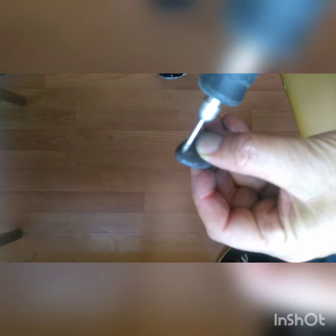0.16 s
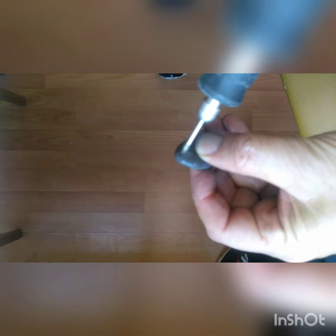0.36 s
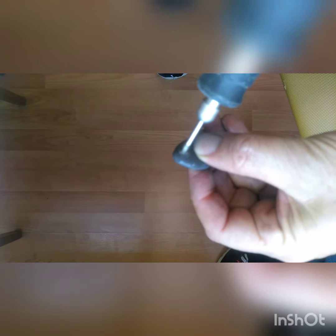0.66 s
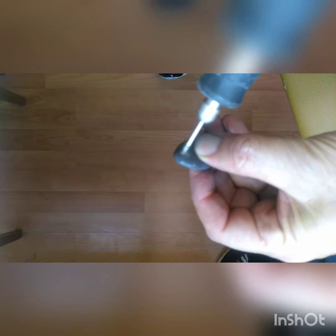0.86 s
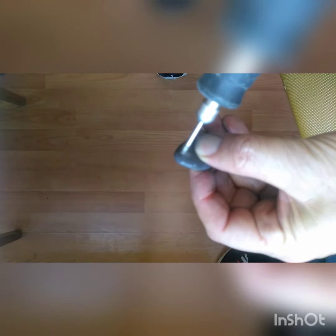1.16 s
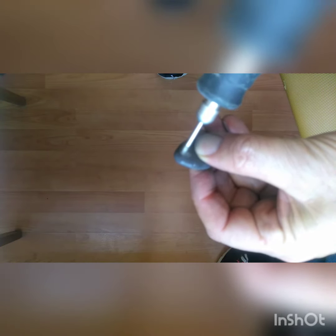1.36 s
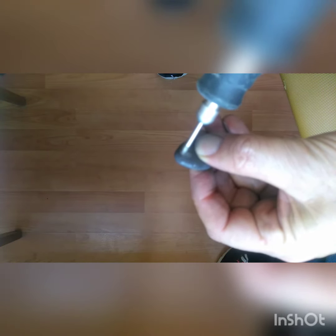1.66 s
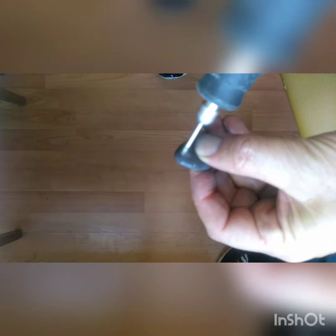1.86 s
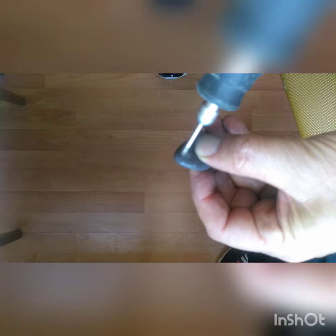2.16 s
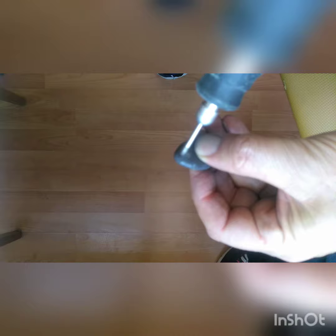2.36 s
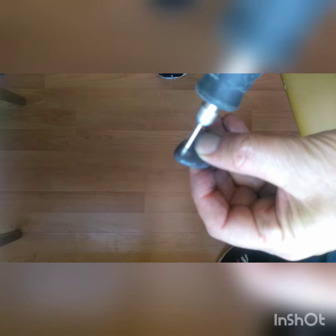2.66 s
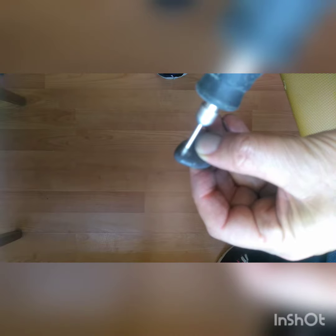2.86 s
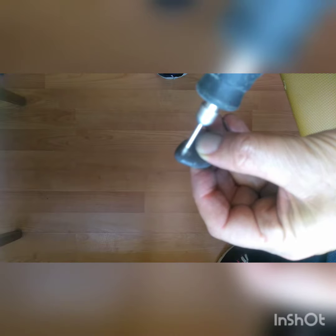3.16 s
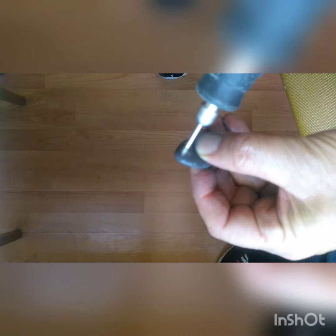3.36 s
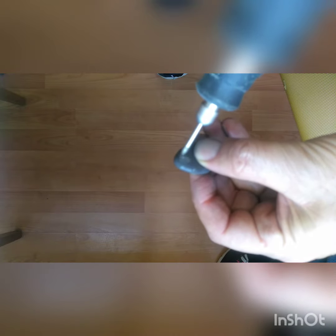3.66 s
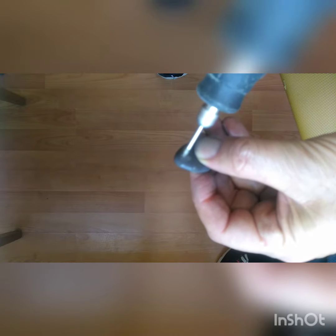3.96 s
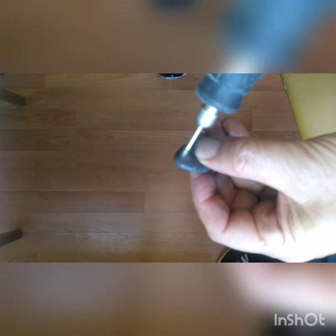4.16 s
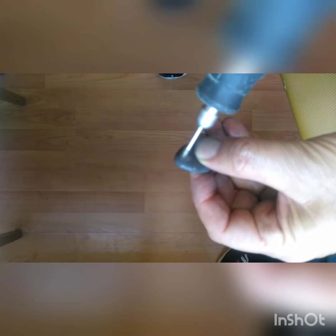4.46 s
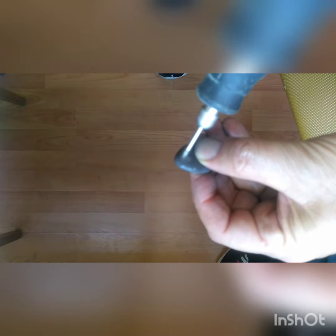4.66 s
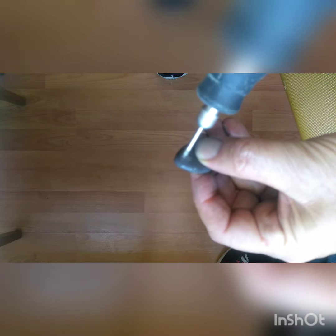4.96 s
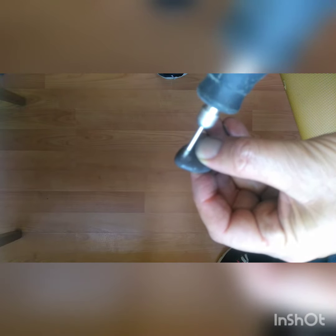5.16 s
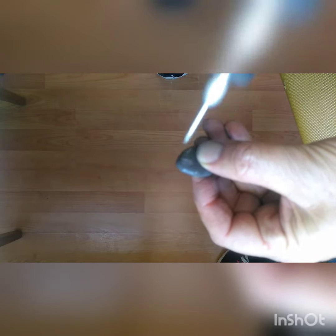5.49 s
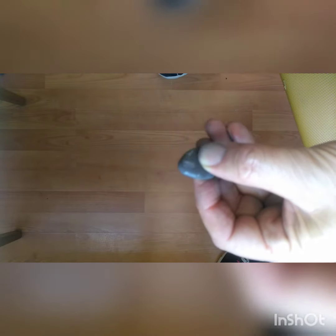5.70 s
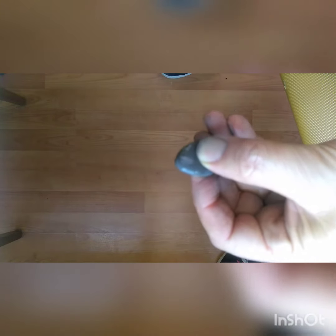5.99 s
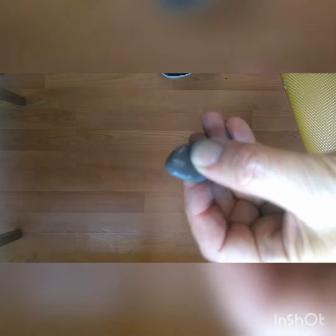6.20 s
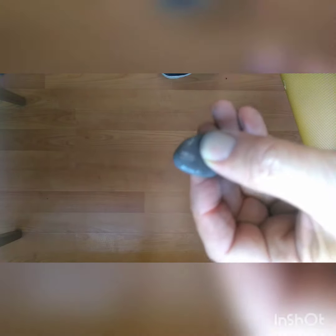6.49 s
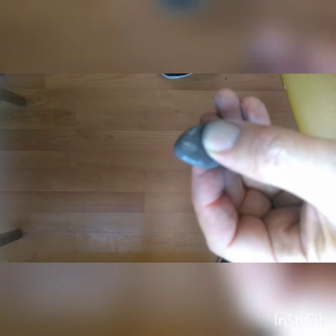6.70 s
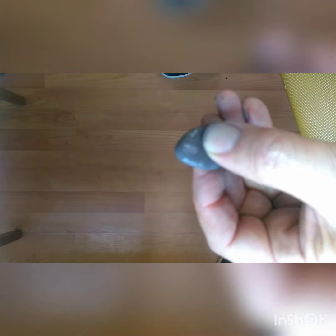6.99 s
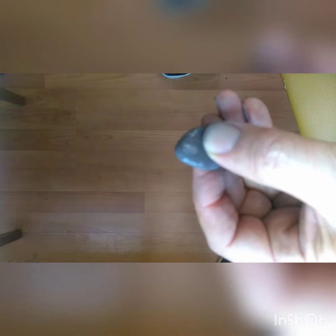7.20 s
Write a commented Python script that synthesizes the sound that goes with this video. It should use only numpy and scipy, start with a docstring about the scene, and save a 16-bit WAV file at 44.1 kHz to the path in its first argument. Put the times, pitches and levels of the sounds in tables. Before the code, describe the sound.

In a room, a handheld electric rotary tool runs at constant high speed, its fine bit buzzing and grinding on a small stone. The grind throbs rapidly, breaks briefly midway, then resumes. A rasping skid and short squeak end contact; the bare whine and airy rush swell close to a mono phone microphone with soft hand thuds, then cut off to near silence.

```python
"""In a room, a mains rotary tool runs at a steady high speed, its small bit pressed on a pebble held in the fingers.
Shaft, fan and bearings whine as sines at multiples of the shaft speed; air and broad grinding are coloured noise.
The bit's blows, one every second turn, ring resonances of stone and shank over filtered grinding noise.
Skids, a chirp, a squeak, thuds and rumble join in; lifted, the tool swings close to a mono phone microphone
until the sound is cut, leaving a faint rumble."""
import sys
import numpy as np
from scipy import signal
from scipy.fft import rfft, irfft, next_fast_len
from scipy.io import wavfile
from scipy.ndimage import uniform_filter1d

SR = 44100
rng = np.random.default_rng(int(sys.argv[2]) if len(sys.argv) > 2 else 0)


def wav_out(sig):
    """Save sig, one row per channel (or a flat mono array), as 16-bit PCM at SR to the path in sys.argv[1]."""
    wavfile.write(sys.argv[1], SR, np.round(np.clip(np.atleast_2d(sig).T, -1, 1) * 32767).astype(np.int16))


N = 323694
TIME = np.arange(N) / SR  # s


def undb(db):
    """Level law: decibels to amplitude gain."""
    return 10 ** (np.asarray(db) / 20)


def unit(x):
    """Power normalisation: scale to rms 1."""
    return x / np.sqrt(np.mean(x ** 2))


def columns(table):
    """Linear interpolation: every column after the time, one value a sample."""
    seconds, *values = np.transpose(table)
    return [np.interp(TIME, seconds, value) for value in values]


def between(table):
    """Gating: one while a curve table lasts, with soft edges."""
    inside = (TIME >= table[0][0]) & (TIME < table[-1][0])
    return uniform_filter1d(1. * inside, size=1500)


def swell(middle, length, db):
    """Amplitude envelope: a smooth rise to a peak in dB and fall, over a length in seconds."""
    away = np.clip(2 * np.abs(TIME - middle) / length, 0, 1)
    return undb(db) * (1 - away * away) ** 2


def walk(rate):
    """Slow random modulation: levels held 1 / rate s and smoothed twice; spread near 1."""
    hold = int(SR / rate)
    steps = np.repeat(rng.standard_normal(N // hold + 1), hold)
    slewed = uniform_filter1d(uniform_filter1d(steps, hold), hold)
    return 1.29 * slewed[:N]


def ring(x, modes):
    """Modal superposition: a sum of resonances, neighbours in opposite phase."""
    out = 0
    for k, (hz, width, db) in enumerate(modes):
        peak = signal.iirpeak(hz, hz / width, SR)
        out = out + (-1) ** k * undb(db) * signal.lfilter(*peak, x)
    return out


def coloured(spectrum):
    """Spectral shaping: white noise given a colour, rms 1."""
    hz, db = np.transpose(spectrum)
    size = next_fast_len(N)
    log_hz = np.log(np.fft.rfftfreq(size, 1 / SR) + 1)
    gain = undb(np.interp(log_hz, np.log(hz), db))
    return unit(irfft(rfft(rng.standard_normal(size)) * gain, size)[:N])


APPROACH_S, ARRIVE_S = 5.677, 6.51  # the tool swings from the stone to the phone


def approach():
    """Proximity: share of the near level, 0 at the stone, 1 by the phone."""
    return np.clip((TIME - APPROACH_S) / (ARRIVE_S - APPROACH_S), 0, 1)


# Shaft speed, drifting slightly down, then rising as the tool nears the phone.
# Each row: time in seconds, speed in Hz.
SPEED = [(0.0, 560.1), (0.7, 560.6), (1.2, 560.26), (1.7, 559.55), (2.8, 559.1), (3.6, 558.15),
         (4.45, 558.95), (5.3, 558.5), (5.7, 558.8), (5.95, 558.5), (6.08, 560.2), (6.5, 560.5),
         (6.9, 561.0)]


def shaft_turns():
    """Phase is the integral of speed: turns of the shaft so far, with a slight random drift."""
    shaft_hz = columns(SPEED)[0]
    return np.cumsum(shaft_hz * (1 + 0.000407 * walk(20))) / SR


# The stronger tones of shaft, bit, fan and bearings. Each entry: multiple of the shaft speed.
BEARING_ORDERS = [2, 4, 3.5, 6.613, 6.99, 7.361, 8, 8.997, 10.481, 10.857, 13.605, 17.994, 5, 5.614, 7.764,
                  10, 10.764, 11.856, 13.992, 14.348, 17.839]
# Starting phases of the first three of them. Each entry: phase in cycles.
IN_STEP = [0.25, 0.027, 0.63]


def tone(turns, order):
    """Shaft-locked harmonic: a sine of rms 1; the first three strong tones keep step with the bit's blows."""
    start = dict(zip(BEARING_ORDERS, IN_STEP)).get(order, rng.random())
    return np.sqrt(2) * np.sin(2 * np.pi * (order * turns + start))


# Tone at shaft speed. Each row: time in seconds, level in dB.
UNBALANCE = [(0.0, -46), (0.04, -44.5), (0.58, -45.5), (3.81, -41.5), (4.19, -43), (5.39, -42.5),
             (5.93, -39.5), (6.23, -45), (6.33, -40), (6.45, -40.5), (6.65, -36), (7.17, -38.5)]
# Levels of the stronger tones, added as powers, before a random flicker. Each row: level far off in dB, level
# added near the phone in dB, swells (middle and length in seconds, peak in dB) as the hand turns the tool or,
# for the fourth and third-and-a-half multiples, also as the shank and the bit sing in short bursts.
BEARING = [(-61.5, -32, [(1.9, 0.74, -65), (3.9, 0.47, -49.5), (5.5, 2.3, -47), (7.1, 1.2, -35)]),
           (-55.5, -39, [(.79, 0.19, -45), (1.02, 0.37, -43), (1.23, 0.15, -41.5), (1.47, 0.33, -44),
           (1.83, 0.25, -53), (2.05, .26, -45), (2.45, 0.61, -49), (3.8, 0.85, -48), (5.3, 1, -47),
           (6.3, 0.7, -38)]), (-63, -52, [(1.45, 0.36, -48), (1.98, 0.4, -47), (2.73, 0.43, -42),
           (3.04, .26, -44), (5.11, .24, -45)]), (-62.5, -39.5, [(.3, .7, -53), (3.9, 2.1, -54),
           (5.65, 0.77, -48)]), (-59, -42, [(.25, .6, -43), (.9, 1.8, -47.5), (2.55, 0.89, -54),
           (5.7, 0.55, -48), (6.48, 0.94, -33.5), (7.18, 0.49, -37)]), (-58, -37.5, [(.6, 0.96, -49),
           (1.45, 1.2, -47), (3.2, 0.51, -47), (4.3, 1.3, -55), (5.85, .3, -50), (6.3, 0.46, -38)]),
           (-50.5, -36.5, [(.2, 0.72, -46), (.65, .8, -45), (.98, 0.46, -45), (1.5, 0.88, -49),
           (2.1, 0.79, -57), (3.7, 1.7, -49), (5.2, 0.77, -52), (5.75, 0.35, -41.5), (5.98, 0.46, -54),
           (6.42, 0.79, -34.5), (7.1, 0.93, -32)]), (-55, -48, [(.7, 2.6, -50), (6.9, 0.55, -44.5)]),
           (-60, -57, [(1.27, 0.39, -48), (1.7, 2, -46.5), (2.7, .4, -49), (3.5, 1.23, -49.5),
           (5.1, 0.33, -47), (6.5, 0.73, -40), (7.18, 0.33, -46)]), (-66, -58.5, [(2.9, 0.89, -60),
           (5.9, 0.48, -50), (6.55, 1, -36.5)]), (-59, -64, [(.3, .6, -57), (3.6, .5, -61),
           (6.2, 1.5, -44.5), (6.9, .4, -50)]), (-66.5, -63, [(.1, 0.49, -63), (2.1, 1.8, -62),
           (4.7, 2.8, -58), (6.1, 0.49, -49.5)]), (-62, -43, [(.4, 1.1, -54), (1.3, 0.51, -52),
           (2.1, .9, -55), (4.5, 0.5, -48.5), (5.38, .3, -49), (6.5, 0.3, -39), (6.9, .4, -38)]),
           (-61, -51.5, [(.75, 0.59, -53), (2.05, 1.2, -50), (3.1, 0.47, -52), (5.3, .4, -53),
           (6.0, 0.38, -47), (7.05, 0.48, -49)]), (-70, -43, [(1.65, 0.47, -58), (2.5, 1.06, -58),
           (4.7, 1.4, -61)]), (-57.5, -51.5, [(2.4, 1.5, -50), (3.1, .3, -51), (4.4, 2.17, -55.5),
           (5.8, 0.43, -48), (6.95, 0.87, -41)]), (-56.5, -43.5, [(3.3, 1.5, -55), (6.55, 1.02, -47)]),
           (-53.5, -48, [(2.7, 1.8, -62), (4.8, 1.2, -51), (6.75, 0.48, -44.5)]),
           (-64.5, -59, [(6.3, .3, -51), (6.9, 0.94, -57.5)]), (-73, -62, [(1.5, 1.1, -62), (3.6, 1.5, -56),
           (5.0, .8, -60), (6.75, 0.47, -51)]), (-71.5, -60.5, [(1.4, .7, -61), (4.1, .8, -64),
           (5.8, 0.71, -58)])]
# Throb of the fan tone, deepest with the bit off the stone. Each row: time in seconds, depth from 0 to 1.
THROB = [(0.0, 0.1), (.8, 0), (3.2, 0.47), (3.7, 0.66), (4.1, 0.5), (5.6, 0.4), (6.2, .8), (6.6, 0.2),
         (7.2, 0.15)]
MAINS_HZ = 99.9  # twice the supply frequency
# Weaker tones of commutator and ball cage. Each entry: multiple of the shaft speed.
WEAK_ORDERS = [3, 3.12, 3.381, 6, 9.766, 10.107, 11, 11.23, 12.598, 14.723, 15.347, 16, 16.093, 16.72,
               17.092, 17.454, 18.831, 19.586, 20.213, 20.585, 20.956, 21.336, 21.707, 23, 23.711, 24.082,
               24.826, 26, 27.204, 27.581, 27.957]
# Their levels before shadowing and a random flicker. Each entry: level in dB over the broad noise.
WEAK_DB = [-20.5, -17, -16, -25, -36, -26.5, -26, -32, -23.5, -36, -42.5, -40, -33, -41.5, -38.5, -45,
           -46.5, -51, -43, -44.5, -46.5, -46, -60, -60.5, -57.5, -59.5, -58, -62, -62.5, -58, -58.5]


def whine(turns, noise):
    """Rotating-machine orders: unbalance and tones that come and go; the fan's throbs by amplitude modulation."""
    out = undb(columns(UNBALANCE)[0]) * tone(turns, order=1)
    depth = columns(THROB)[0]
    for order, (far_db, near_db, swells) in zip(BEARING_ORDERS, BEARING):
        near = undb(near_db) * approach()
        power = undb(far_db) ** 2 + near ** 2 + sum(swell(*s) ** 2 for s in swells)
        # only order 8, from the fan blades, throbs with the supply
        throb = 1 + depth * (order == 8) * np.cos(2 * np.pi * MAINS_HZ * TIME)
        out += throb * np.sqrt(power) * undb(0.73 * walk(9)) * tone(turns, order)
    for order, db in zip(WEAK_ORDERS, WEAK_DB):
        # the lower ones come out of the vents and are shadowed until these face the microphone
        facing = (noise / noise.max()) ** (.5 * (order < 5.5))
        out += noise * facing * undb(db + 2.2 * walk(2.3)) * tone(turns, order)
    return out


# levels of the direct noise: vent air alone, vent air with broad grinding noise, vent air added by the phone
VENT_DB, VENT_AND_GRINDING_DB, VENT_NEAR_DB = -44, -40, -24
CONTACT_EDGE_S = 0.2  # smoothing of the change as contact begins or ends


def direct_level():
    """Power addition: vent air, with broad grinding noise added while the bit is on the stone,
    and much louder near the phone."""
    contact = sum(between(table) for table in CONTACT)
    grinding = uniform_filter1d(contact, int(CONTACT_EDGE_S * SR))
    far = undb(VENT_DB + (VENT_AND_GRINDING_DB - VENT_DB) * grinding)
    return np.hypot(far, undb(VENT_NEAR_DB) * approach())


ROOM_DB = -38  # air heard through the room
# Colour of the air heard through the room. Each row: frequency in Hz, relative density in dB per Hz.
ROOM_AIR = [(20, -68.5), (60, -48), (90, -45), (130, -25.5), (300, -19.5), (650, -15.5), (1200, -1.5),
            (2190, -6), (3160, -20), (4440, -17.5), (5770, -13.5), (8000, -21), (10300, -32.5),
            (11400, -52), (12300, -57), (15600, -87.5)]
# Colour of the direct noise, vent air and broad grinding alike. Each row: frequency in Hz,
# relative density in dB per Hz.
DIRECT_NOISE = [(20, -59.5), (60, -44), (197, -21.5), (600, -23.5), (1030, -9), (1200, -2), (1350, -0.5),
                (1600, -5), (1950, -11), (2600, -8.5), (3500, -14.5), (4900, -14.5), (6500, -20),
                (7890, -27.5), (11700, -50), (15600, -64.5)]
# Bands of the direct noise that surge alone. Each row: centre in Hz, width in Hz, relative level in dB.
SURGE = [(1255, 500, 3.5), (2300, 780, -6), (4300, 2500, -11.5)]


def air_and_grinding(turns, level):
    """Broadband noise: fan air and broad grinding, puffing a little once a turn; the direct part flickers."""
    puff = 1 + 0.16 * np.cos(2 * np.pi * turns)
    room = undb(ROOM_DB) * coloured(ROOM_AIR)
    rush = coloured(DIRECT_NOISE)
    surges = sum(0.12 * walk(14) * ring(rush, [band]) for band in SURGE)
    direct = level * undb(.5 * walk(30)) * (rush + surges)
    return puff * (room + direct)


def gripped(blows, modes, flicker_db, rate):
    """Varying modal response: resonances swell and dip alone as the grip shifts, the first the least."""
    out = 0
    for k, mode in enumerate(modes):
        flicker = undb(flicker_db * min(k + .3, 1) * walk(rate))
        out = out + (-1) ** k * flicker * ring(blows, [mode])
    return unit(out)


# Bit on stone, one table a contact. Each row: time in seconds, knock in the stone in dB,
# knock in the shank in dB, bending note in dB before a random flicker, mean wobble rate in Hz.
CONTACT = [
    [(0.0, -49, -50, -46, 34.3), (0.18, -45, -41.5, -46.5, 34.1), (0.3, -37.5, -43, -47, 35.4),
     (0.8, -42.5, -40, -58, 34.86), (1.2, -41, -42, -60, 33.95), (1.45, -38.5, -41, -60, 31.5),
     (1.8, -39.5, -39.5, -63, 33.05), (2.1, -37, -40.5, -61, 34.08), (2.31, -39, -38, -53, 35.14),
     (2.4, -35, -39.5, -58, 36.4), (2.6, -34.5, -43, -36.5, 35.75), (2.95, -34, -43, -54, 30.6),
     (3.385, -34.5, -40.5, -42, 31.4), (3.45, -43, -54, -60, 30.75)],
    [(3.85, -50, -43, -55, 34), (4.02, -50, -46.5, -53, 34.7), (4.13, -38.5, -41.5, -42.5, 34.9),
     (4.3, -39.5, -42.5, -45, 35.5), (4.52, -36.5, -41, -41.5, 35.83), (4.575, -40, -41, -54, 33.9),
     (4.62, -35.5, -42, -48, 31.6), (4.8, -34.5, -42.5, -38, 33.4), (4.93, -35.5, -41, -48, 34),
     (5.05, -34.5, -39.5, -62, 34.66), (5.17, -35.5, -43, -55, 35.6), (5.24, -37, -42, -59, 35.6),
     (5.38, -46, -60, -62, 35.8)],
]
# Resonances of the stone. Each row: frequency in Hz, width in Hz, relative level in dB.
STONE = [(1129, 116, 4.5), (1400, 126, 0.5), (1607, 145, 1.5), (1956, 260, -1), (870, 180, -13.5)]
# Resonances of the shank. Each row: frequency in Hz, width in Hz, relative level in dB.
SHANK = [(2198, 47, 2.5), (2790, 140, -9), (3070, 90, -8), (3360, 58, -10.5)]
# Bands of the grinding hiss. Each row: centre in Hz, width in Hz, relative level in dB.
GRIT = [(6715, 490, -3.5), (5540, 3600, -11), (3430, 2760, -14)]
HISS_DB, HISS_SLOPE = -42, 1  # grinding hiss at a stone knock of -38 dB, and its dB per dB of knock
BENDING_LEAD = 0.37  # radians by which the bending note leads the wobble


def bit(turns):
    """Subharmonic impact: the bit bounces every second turn; it wobbles in the hole, so the blows throb."""
    out = np.zeros(N)
    for table in CONTACT:
        stone_db, shank_db, bending_db, wobble_hz = columns(table)
        hiss_db = HISS_DB + HISS_SLOPE * (stone_db + 38)
        wobble = 2 * np.pi * np.cumsum(wobble_hz * (1 + 0.016 * walk(12))) / SR
        # the wobble and the unsteady hand shift the blows early and late
        bounce = turns / 2 + 0.023 * np.sin(wobble + 1.7) + 0.019 * walk(33)
        at = np.flatnonzero(np.diff(np.floor(bounce)) > 0)
        strength = (1 + 0.28 * np.cos(wobble)) * undb(1.05 * walk(45) + 1.5 * walk(250))
        size = strength[at]
        # each blow is shared by two samples to fall between them
        early = bounce[at + 1] % 1 / np.diff(bounce)[at]
        blows = np.zeros(N)
        blows[at] = size * early
        blows[at + 1] = size * (1 - early)
        blows = signal.sosfilt(signal.butter(2, 4500, fs=SR, output="sos"), blows)  # a blow takes time
        knock = undb(stone_db) * gripped(blows, STONE, flicker_db=1.6, rate=17)
        knock += undb(shank_db) * gripped(blows, SHANK, flicker_db=2.2, rate=17)
        # the bit's own bending note lies one wobble rate above the second shaft multiple and beats with it
        bending = np.sqrt(2) * np.cos(4 * np.pi * turns + wobble + BENDING_LEAD)
        bending *= undb(bending_db + 1.0 * walk(8.1))
        # the grinding fades after each blow and throbs with the wobble
        scrape = 1.4 + np.exp(-(bounce % 1) / 0.51)
        scrape *= (1 + 0.16 * np.cos(wobble)) * rng.standard_normal(N)
        grind = signal.sosfilt(signal.butter(4, 8000, fs=SR, output="sos"), ring(scrape, GRIT))
        out += between(table) * (knock + bending + undb(hiss_db) * unit(grind))
    return out


# Rumble as hands and air move by the phone. Each row: time in seconds, level in dB before a random flicker.
HANDLING = [(0.55, -82), (0.85, -71), (1.1, -76), (1.25, -58), (1.5, -76), (4.95, -78), (5.02, -63),
            (5.18, -59), (5.3, -69), (5.8, -63), (6.1, -69), (6.22, -49.5), (6.5, -54), (6.7, -56.5),
            (6.9, -65), (7.18, -59.5)]


def handling():
    """Band-limited noise: an uneven low rumble."""
    band = signal.butter(2, [65, 300], "band", fs=SR, output="sos")
    low = signal.sosfilt(band, rng.standard_normal(N))
    return between(HANDLING) * undb(columns(HANDLING)[0] + 2.8 * walk(15)) * unit(low)


# Dull knocks of the hands. Each row: start in seconds, level in dB before the onset and decay,
# frequency in Hz, time to decay by 60 dB in seconds.
KNOCKS = [(1.218, -43, 247.5, 0.098), (4.55, -56, 70, .08), (5.014, -45, 110.3, 0.07),
          (5.07, -41, 180, 0.068), (5.125, -43, 95, 0.071), (5.185, -47, 160, 0.046),
          (5.362, -45, 110, .04), (5.462, -48, 85, 0.06), (5.774, -38, 160, 0.035), (6.2, -33, 270, .06),
          (6.32, -35, 202, .07), (6.439, -36.5, 205, 0.086)]


def knocks():
    """Damped oscillation: soft thuds, each a sine dying away exponentially."""
    out = np.zeros(N)
    for start, db, hz, t60 in KNOCKS:
        t = np.maximum(TIME - start, 0)
        onset = 1 - np.exp(-t / 0.0015)
        decay = np.exp(-np.log(1000) * t / t60)
        out += undb(db) * onset * decay * np.sin(2 * np.pi * hz * t)
    return out


# The bit skids over the stone. Each row: middle in seconds, length in seconds, peak in dB.
SLIPS = [(2.302, .12, -41), (5.082, .22, -53), (5.301, .26, -38.5)]
# Resonances of the rasp, passed twice. Each row: frequency in Hz, width in Hz, relative level in dB a pass.
RASP = [(2080, 1170, -3.5), (3120, 940, 0), (4430, 1200, -6)]


def slips():
    """Resonated friction noise: a grainy rasp at each skid."""
    grain = undb(2.4 * walk(150)) * rng.standard_normal(N)
    rasp = unit(ring(ring(grain, RASP), RASP))
    return sum(swell(*s) for s in SLIPS) * rasp


# The shank rings once as the bit catches. One row: middle in seconds, length in seconds, peak in dB,
# frequency in Hz.
CHIRP = (5.028, 0.3, -47, 3052)


def chirp():
    """Single-mode ringing: one brief sine of steady pitch."""
    middle, length, db, hz = CHIRP
    return swell(middle, length, db) * np.sqrt(2) * np.sin(2 * np.pi * hz * TIME)


# The bit slips free. Each row: time in seconds, frequency in Hz, level in dB.
SQUEAK = [(5.225, 2070, -50), (5.245, 2060, -34), (5.275, 2045, -35), (5.3, 2000, -41), (5.33, 2040, -43),
          (5.42, 2050, -52)]


def squeak():
    """Frequency modulation: a short whistle that falls, then turns up."""
    hz, db = columns(SQUEAK)
    whistle = np.sqrt(2) * np.sin(2 * np.pi * np.cumsum(hz) / SR)
    return between(SQUEAK) * undb(db) * whistle


# Treble of the rush as the tool swings past. One row: middle in seconds, length in seconds, peak in dB.
SHEEN = (6.13, 1, -39.5)
# Its bands, passed twice. Each row: centre in Hz, width in Hz, relative level in dB a pass.
SHEEN_BAND = [(6900, 1700, 3), (10900, 1900, -14)]


def sheen():
    """Resonance-filtered noise: a passing bright hiss."""
    hiss = ring(ring(rng.standard_normal(N), SHEEN_BAND), SHEEN_BAND)
    return swell(*SHEEN) * unit(hiss)


# Band of the rush that slides while the tool swings near. Each row: time in seconds, centre in Hz, level in dB.
SWING = [(5.85, 1801, -55), (5.95, 2107, -39), (6.05, 2300, -33), (6.15, 2783, -33.5), (6.25, 2546, -33.5),
         (6.35, 2360, -35), (6.45, 2370, -57)]


def swing():
    """Quadrature modulation: slow noise carried on a sliding centre frequency."""
    hz, db = columns(SWING)
    phase = 2 * np.pi * np.cumsum(hz) / SR
    band = walk(1600) * np.cos(phase) + walk(1600) * np.sin(phase)
    return between(SWING) * undb(db) * unit(band)


CUT_S, AFTER_DB = 7.1815, -89.5  # time of the cut, and level of the rumble after it
# Band of that rumble, passed twice. Each row: centre in Hz, width in Hz, relative level in dB a pass.
AFTER = [(160, 180, 0)]


def cut(sound):
    """Windowing: the sound is faded out within 1.5 ms; a faint band of noise follows."""
    running = np.sin(np.pi / 2 * np.clip((CUT_S - TIME) / 0.0015, 0, 1)) ** 2
    rumble = undb(AFTER_DB) * unit(ring(ring(rng.standard_normal(N), AFTER), AFTER))
    return running * sound + (TIME > CUT_S) * rumble


def scene():
    """Superposition: tool, bit and hands, the same in both channels."""
    turns = shaft_turns()
    level = direct_level()
    noise = np.hypot(undb(ROOM_DB), level)
    sound = whine(turns, noise) + air_and_grinding(turns, level) + bit(turns)
    sound += handling() + knocks() + slips() + chirp() + squeak() + sheen() + swing()
    return np.tile(cut(sound), (2, 1))


TOP_HZ = 15735  # upper limit of the phone


def record(dry):
    """Band limiting: the phone thins the bass and cuts the top."""
    thin = signal.sosfilt(signal.butter(2, 55, "high", fs=SR, output="sos"), dry)
    return signal.sosfilt(signal.ellip(12, .2, 70, TOP_HZ, fs=SR, output="sos"), thin)


dry = scene()
out = record(dry)
wav_out(out)
```